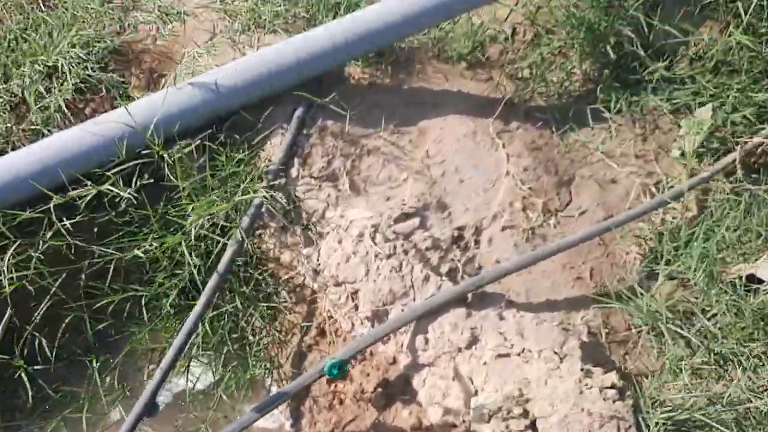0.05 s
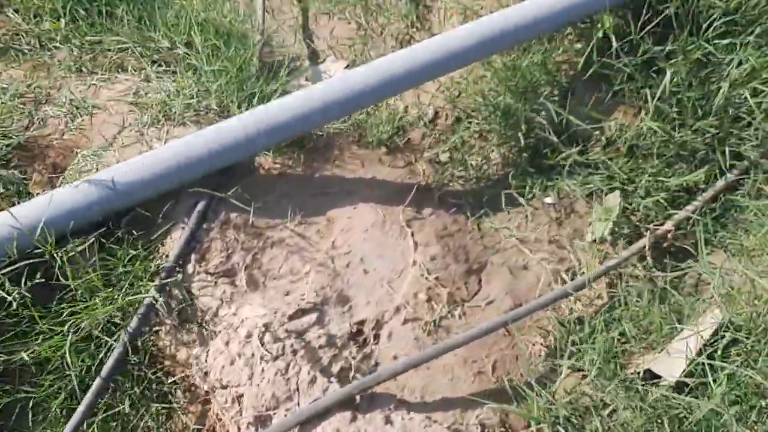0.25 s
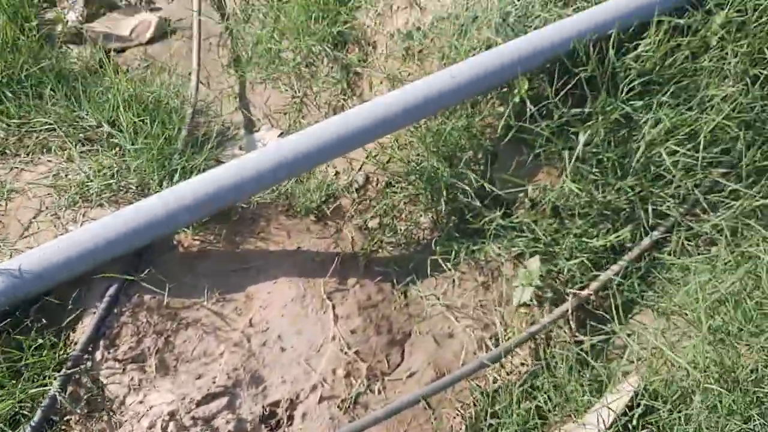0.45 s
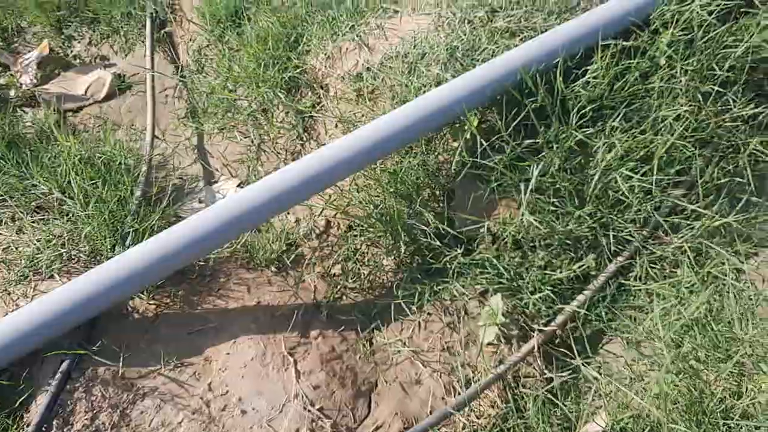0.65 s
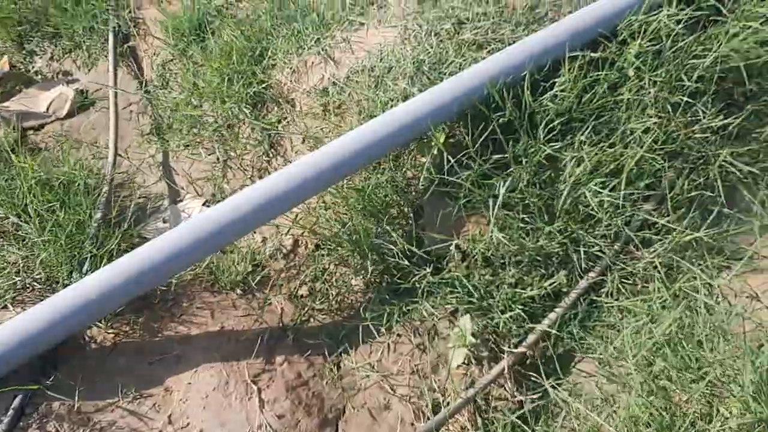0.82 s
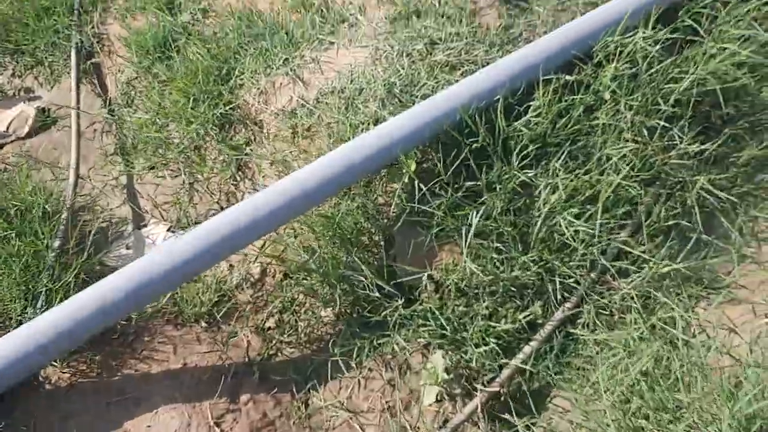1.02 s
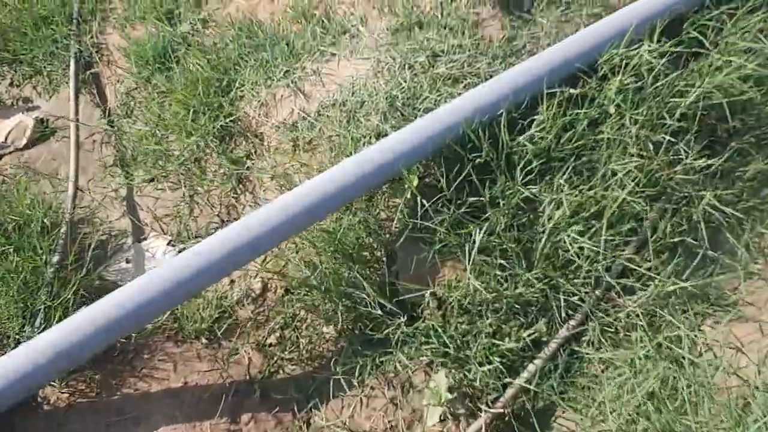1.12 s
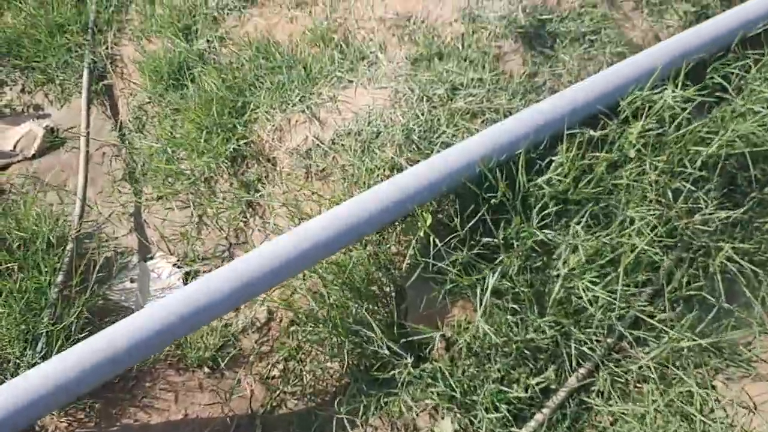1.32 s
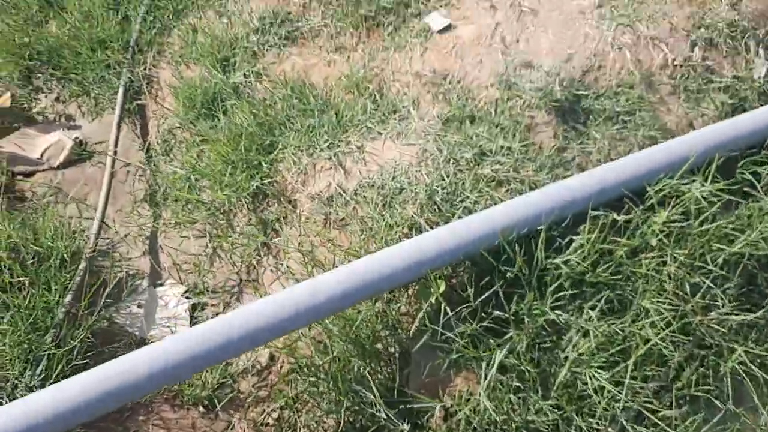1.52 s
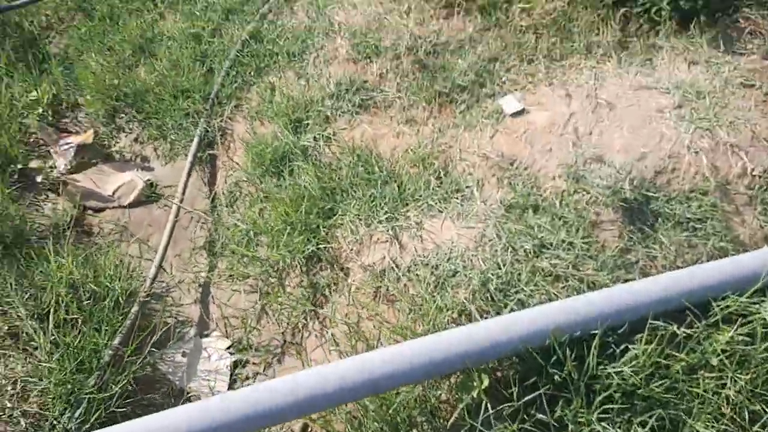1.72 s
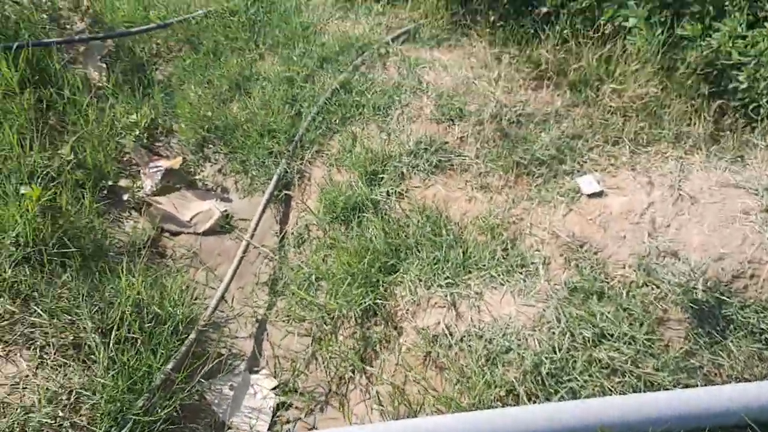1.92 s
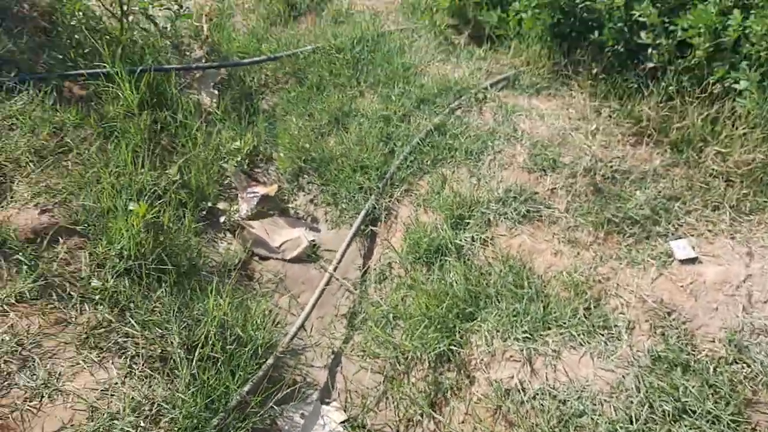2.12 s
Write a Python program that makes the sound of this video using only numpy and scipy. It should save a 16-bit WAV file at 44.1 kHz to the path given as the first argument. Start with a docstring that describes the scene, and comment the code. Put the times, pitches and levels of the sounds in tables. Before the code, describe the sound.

Low, fluttering wind rumble hits a hand-held microphone, mostly on the right, first strongly and then more weakly. Beneath it are quiet outdoor air, faint handling ticks and light footsteps on grass, ending with small snaps of dry stalks.

```python
"""A hand-held camera is carried over a grassy field; its left port is muffled. Quiet open air runs throughout.
First a step crushes the grass and the grip ticks faintly. From 0.2 s a gust buffets the ports, mostly the
right one: a low flutter with single thumping eddies. Clothing swishes as it fades. A weaker gust peaks
at 1.5 s, then dry stalks snap under the last steps."""
import sys
import numpy as np
from scipy import signal
from scipy.fft import rfft, irfft, next_fast_len
from scipy.io import wavfile
from scipy.ndimage import uniform_filter1d, map_coordinates

SR = 44100
rng = np.random.default_rng(int(sys.argv[2]) if len(sys.argv) > 2 else 0)


def persist_wave(psi):
    """Save psi, clipped to +-1, as 16-bit WAV."""
    counts = np.round(np.clip(psi, -1, 1) * 32767).astype(np.int16)
    wavfile.write(sys.argv[1], SR, np.atleast_2d(counts).T)


N = 94815

# Spectra. Each row: frequency in Hz, level in dB.
AIR_SPECTRUM = [(25, -5), (68, 15), (140, 1), (220, -0.5), (350, 7), (520, -4), (1000, -3), (1400, -1),
                (2050, -4), (2800, -8), (5000, -14), (8500, -16.5), (9800, -27.5), (15500, -21.5)]
FAR_HISS_SPECTRUM = [(1200, -39), (1750, -12.5), (2000, 5.5), (2200, -10), (2600, -31), (5000, -70)]
BLADE_SPECTRUM = [(1000, -9), (2100, 10), (3800, -8), (6000, -19), (8500, -4.5), (10000, -18),
                  (15500, -23)]
CASE_SPECTRUM = [(2000, -28), (6500, -10.5), (8400, 2), (9800, -19), (11500, -6), (13500, 2), (15500, -3.5)]
CLOTH_SPECTRUM = [(1000, -12), (2400, -10.5), (2900, -6), (3200, -5.5), (3550, 8.5), (3850, -2.5),
                  (4200, 1), (5000, 0), (6200, -5), (7200, -33), (10000, -22), (15500, -18)]
GRASS_SPECTRUM = [(200, -10), (500, -16), (1500, -12.5), (2400, -5), (4300, -10.5), (5500, -10),
                  (7000, -4.5), (8500, 0.5), (9800, -9.5), (15500, -14.5)]
SOIL_SPECTRUM = [(150, -52), (400, -1.5), (900, -7.5), (1400, -6.5), (2100, -14.5), (3000, -20),
                 (6000, -26), (15000, -56)]
RUMBLE_SPECTRUM = [(20, -36), (40, -9), (62, 3.5), (110, -0.5), (170, -8), (250, -19.5), (350, -16.5),
                   (500, -47.5), (900, -78), (2000, -120)]
FLUTTER_SPECTRUM = [(60, -45), (150, -13), (240, 1), (335, 7), (400, -13), (490, -23.5), (650, -47),
                    (1000, -67), (2500, -110)]
RASP_SPECTRUM = [(220, -5.5), (400, 1), (540, -1.5), (680, -10), (820, -18.5), (1150, -36.5), (2500, -84)]
MIC_HISS_SPECTRUM = [(1000, -2), (6000, -23), (10000, -20), (14000, -17.5)]
# Left port responses. Each row: frequency in Hz, gain in dB.
LEFT_MUFFLE = [(100, 1.5), (450, -1.5), (900, -0.5), (1400, -6.5), (2000, -11.5), (3500, -14),
               (5000, -22.5), (7000, -29), (8500, -58), (11000, -33), (15500, -19)]
LEFT_CLOTH_RESPONSE = [(1000, 3), (2200, 8.5), (3000, -5.5), (3600, -7), (4400, -24), (5200, -29),
                       (7000, -35), (15000, -30)]
# Background and wind envelopes. Each row: time in seconds, relative level in dB.
AIR_LEVELS = [(0, -61), (.7, -52.5), (1.2, -54.5), (1.7, -55), (2.15, -55.5)]
FAR_HISS_LEVELS = [(0, -83), (.55, -68), (1.0, -71), (1.25, -61.5), (1.5, -73.5), (2.15, -76)]
LEFT_WIND_LEVELS = [(0, -69.5), (0.08, -59), (0.18, -39.5), (0.24, -41), (0.275, -18.5), (0.32, -42.5),
                    (0.55, -39.5), (0.67, -51), (0.79, -51.5), (0.87, -41.5), (1.0, -54.5), (1.13, -62.5),
                    (1.46, -42), (1.56, -59), (1.82, -63), (2.09, -64), (2.14, -50.5)]
RIGHT_WIND_LEVELS = [(0, -49), (.13, -41.5), (.19, -38), (.23, -27), (.33, -19), (.44, -23), (.57, -27.5),
                     (.66, -33.5), (.76, -37), (.81, -24.5), (.86, -44), (1.04, -37), (1.1, -50),
                     (1.25, -50.5), (1.28, -48), (1.34, -39.5), (1.5, -29), (1.55, -31), (1.58, -45),
                     (1.66, -45), (1.7, -41), (1.79, -52), (2.09, -57.5), (2.14, -43.5)]
# Rubbing strokes. Each row: start in seconds, length in seconds, level in dB.
HAND_SLIDES = [(.11, 0.15, -57), (.28, 0.14, -63.5), (.55, 0.15, -57.5), (.8, 0.13, -63.5),
               (1.14, 0.055, -70), (1.23, .14, -62)]
CLOTH_SWISHES = [(.545, 0.16, -55.5), (.762, 0.026, -53.5), (.85, .04, -58.5)]
# Grip ticks. Each row: start in seconds, peak in dB.
GRIP_TICKS = [(0.113, -44), (.142, -49), (0.144, -56), (.337, -55), (0.421, -57), (.552, -52), (0.74, -47),
              (0.75, -49), (0.984, -52.5), (1.099, -53), (1.118, -48), (1.221, -57)]
# Feet on grass and soil. Each row: peak time in seconds, peak in dB, rise and fall in seconds per 20 dB.
GRASS_STEPS = [(.05, -47, 0.032, 0.11), (.072, -34.5, 0.014, 0.025), (.125, -47, 0.14, 0.24),
               (.86, -60.5, 0.14, 0.086), (1.315, -56.5, 0.25, 0.13), (1.741, -53.5, 0.067, 0.052)]
SOIL_TREADS = [(.19, -48.5, 0.75, 0.82), (.87, -54, 0.18, .12), (1.33, -56, 0.083, 0.046),
               (1.745, -53, 0.11, 0.064), (2.125, -55.5, 0.045, 0.088)]
# Dry stalks breaking. Each row: start in seconds, level in dB, pitch in Hz.
STALK_SNAPS = [(0.0716, -25, 7970), (.169, -32.5, 1800), (0.215, -34, 2050), (0.346, -44, 2440),
               (.892, -47, 4050), (1.845, -48, 2240), (1.87, -43.5, 2240), (1.892, -44.5, 1190),
               (2.01, -37.5, 940), (2.032, -49, 1510), (2.077, -47.5, 3400), (2.123, -43.5, 1810)]
# Eddies at the right port. Each row: centre in seconds, thump in dB, thump pitch in Hz, flutter in dB.
PORT_EDDIES = [(0.212, -12.5, 91.5, -26), (0.234, -24, 150, -26.5), (0.242, -9.5, 176, -17.5),
               (.281, -10.5, 91, -30.5), (.301, -46, 200, -19.5), (0.31, -9.5, 198.8, -19),
               (0.325, -26.5, 162, -21.5), (0.34, -10.5, 105, -25), (.372, -8.5, 111.5, -31),
               (.387, -13, 294, -21), (0.417, -19.5, 295, -22), (.446, -22, 146, -29),
               (0.47, -19, 123.7, -24), (0.484, -40, 201, -21), (0.5, -29, 149, -33),
               (0.517, -15.5, 157, -28.5), (0.522, -48, 162, -25), (0.554, -19.5, 158, -26),
               (.572, -13.5, 218, -23.5), (.631, -21, 292, -27.5), (.69, -29.5, 149, -36),
               (.708, -25.5, 140, -35.5), (0.788, -31, 130, -34), (0.811, -13.5, 104, -30.5),
               (0.82, -40, 184, -29), (.876, -25.5, 151, -34.5), (0.916, -28, 151, -39),
               (0.945, -25, 135, -32.5), (0.955, -25, 100, -53), (0.995, -25, 97, -44),
               (1.037, -25, 90, -42.5), (1.276, -28, 108, -40.5), (1.368, -25, 105, -47),
               (1.406, -28, 125, -39), (1.433, -22, 100, -43), (1.484, -18, 120, -34),
               (1.51, -19.5, 142, -37.5), (1.546, -26, 92.5, -46), (1.613, -23, 124, -38),
               (1.694, -29, 74.5, -60), (2.125, -36, 109, -49.5)]

TIME_S = np.arange(N) / SR


def amp(db):
    """Decibels to gain."""
    return 10 ** (np.asarray(db) / 20)


def unit(x):
    """Scale to rms 1."""
    return x / np.sqrt(np.mean(x ** 2) + 1e-20)


def curve(rows):
    """Breakpoints to one value per sample."""
    return np.interp(TIME_S, *np.transpose(rows))


def wobble(rate_hz):
    """Smooth random curve, rate_hz knots a second."""
    return map_coordinates(rng.standard_normal(4000), [TIME_S * rate_hz + 2], mode="wrap")


def filtered(x, response):
    """Apply a frequency response."""
    size = next_fast_len(N + SR // 2)
    return irfft(rfft(x, size) * response(np.fft.rfftfreq(size, 1 / SR)), size)[..., :N]


def colour(x, spectrum):
    """Filter by a spectrum table, interpolated in log frequency."""
    knots_hz, db = np.transpose(spectrum)
    return filtered(x, lambda hz: amp(np.interp(np.log(hz + 1), np.log(knots_hz + 1), db)))


def noise(spectrum):
    """Coloured noise, rms 1."""
    return unit(colour(rng.standard_normal(N), spectrum))


def crackle(spectrum, rate_hz, share):
    """Tiny random fractures over smooth hiss; share is their part of the power."""
    grains = rng.standard_normal(N) * (rng.random(N) < rate_hz / SR)
    return np.sqrt(share) * unit(colour(grains, spectrum)) + np.sqrt(1 - share) * noise(spectrum)


def swells(rows):
    """Exponential rises and falls, summed in power."""
    return np.sqrt(sum(amp(db - 20 * np.maximum((at_s - TIME_S) / rise_s, (TIME_S - at_s) / fall_s)) ** 2
                       for at_s, db, rise_s, fall_s in rows))


def strokes(rows, edge_s):
    """Held levels, fading 20 dB per edge_s at both ends."""
    envelope = np.zeros(N)
    for start_s, length_s, db in rows:
        outside_s = np.maximum(start_s - TIME_S, TIME_S - start_s - length_s)
        envelope += amp(db - 20 * np.maximum(0, outside_s) / edge_s)
    return envelope


def open_air():
    """Distant rush and narrow hiss; dry blades stir nearby."""
    rush = amp(curve(AIR_LEVELS) + 0.6 * wobble(7.75)) * crackle(AIR_SPECTRUM, rate_hz=190, share=0.14)
    blades = unit(amp(25 * np.tanh(wobble(200) - 1)) * noise(BLADE_SPECTRUM))
    far_hiss = amp(curve(FAR_HISS_LEVELS)) * noise(FAR_HISS_SPECTRUM)
    return rush + far_hiss + amp(-70) * blades


def handling(tick_t60_s=0.014):
    """The hand slides and ticks on the case."""
    ticks = sum((TIME_S >= start_s) * amp(db - 60 * np.abs(TIME_S - start_s) / tick_t60_s)
                for start_s, db in GRIP_TICKS)
    slides = strokes(HAND_SLIDES, edge_s=0.02) * crackle(CASE_SPECTRUM, rate_hz=1200, share=0.65)
    return slides + ticks * noise(CASE_SPECTRUM)


def clothing():
    """Cloth rubs on cloth in short, uneven swishes."""
    envelope = strokes(CLOTH_SWISHES, edge_s=0.025) * amp(1.5 * wobble(44.2))
    return envelope * crackle(CLOTH_SPECTRUM, rate_hz=2000, share=0.23)


def steps(snap_t60_s=0.011, snap_rise_s=0.00054):
    """Grass crackles, soil gives and stalks snap underfoot."""
    grass = swells(GRASS_STEPS) * crackle(GRASS_SPECTRUM, rate_hz=1600, share=0.67)
    soil = swells(SOIL_TREADS) * crackle(SOIL_SPECTRUM, rate_hz=350, share=0.58)
    snaps = np.zeros(N)
    for start_s, db, hz in STALK_SNAPS:
        age_s = np.maximum(TIME_S - start_s, 0)
        envelope = amp(db - 60 * age_s / snap_t60_s) * (1 - np.exp(-age_s / snap_rise_s))
        snaps += envelope * np.sin(2 * np.pi * hz * age_s) * (1 + 0.3 * wobble(900))
    return grass + soil + snaps


def turbulence(spectrum):
    """Noise at rms 1, chance swells evened out so the flow sets its level."""
    raw = noise(spectrum)
    power = uniform_filter1d(np.abs(signal.hilbert(raw)) ** 2, size=700) + 0.05
    return unit(raw / uniform_filter1d(power, size=400) ** 0.45)


def wind(levels, flutter_db, strong_db=-22.5, flutter_growth=1.37):
    """Flow over one port: rumble, plus uneven flutter that grows faster with the wind."""
    level_db = curve(levels)
    rumble = amp(level_db) * turbulence(RUMBLE_SPECTRUM)
    flutter = unit(amp(9 * np.tanh(wobble(71.2))) * turbulence(FLUTTER_SPECTRUM))
    return rumble + amp(strong_db + flutter_db + flutter_growth * (level_db - strong_db)) * flutter


def eddies(half_width_cycles=0.59, rise_s=0.0049, fall_s=0.018, strong_db=-22.5, rasp_db=-6.5):
    """Each eddy pushes and pulls once on the port, then breaks up into flutter."""
    thumps = np.zeros(N)
    for at_s, db, hz, _ in PORT_EDDIES:
        cycles = hz * (TIME_S - at_s)
        thumps += amp(db) * np.sin(2 * np.pi * cycles) * np.exp(-(cycles / half_width_cycles) ** 2)
    bursts = swells([(at_s, db, rise_s, fall_s) for at_s, _, _, db in PORT_EDDIES])
    bursts = np.abs(uniform_filter1d(bursts, size=90))
    rasp = amp(strong_db + rasp_db) * (bursts / amp(strong_db)) ** 2.08  # only hard eddies rasp
    return thumps + bursts * turbulence(FLUTTER_SPECTRUM) + rasp * turbulence(RASP_SPECTRUM)


def scene(common_share=0.22, left_delay_s=0.00048):
    """Field sounds reach both ports, the left later and duller; each has its own wind and mic hiss."""
    field, diffuse = [steps() + handling() + open_air() for _ in range(2)]
    delayed = filtered(field, lambda hz: np.exp(-2j * np.pi * hz * left_delay_s))
    left = colour(np.sqrt(common_share) * delayed + np.sqrt(1 - common_share) * diffuse, LEFT_MUFFLE)
    left += colour(clothing(), LEFT_CLOTH_RESPONSE)
    left += amp(0.5) * wind(LEFT_WIND_LEVELS, flutter_db=-22)
    right = field + clothing() + amp(-1) * wind(RIGHT_WIND_LEVELS, flutter_db=-13) + eddies()
    mic_hiss = amp(-77) * np.array([noise(MIC_HISS_SPECTRUM) for _ in range(2)])
    return np.array([left, right]) + mic_hiss


def record(dry, cutoff_hz=15850):
    """The camera's band limit."""
    return filtered(dry, lambda hz: hz < cutoff_hz)


dry = scene()
out = record(dry)
persist_wave(out)
```